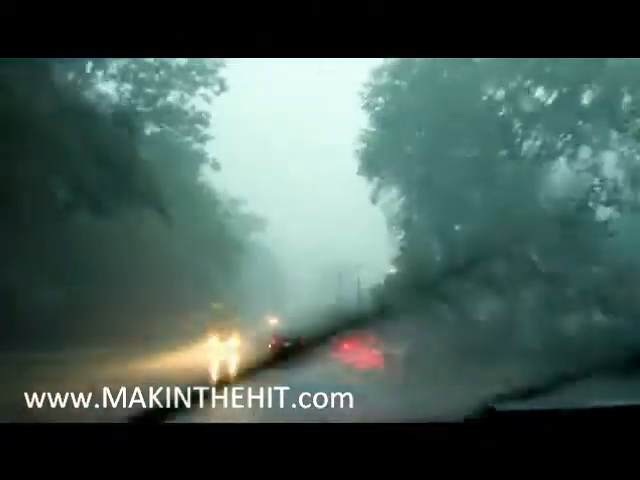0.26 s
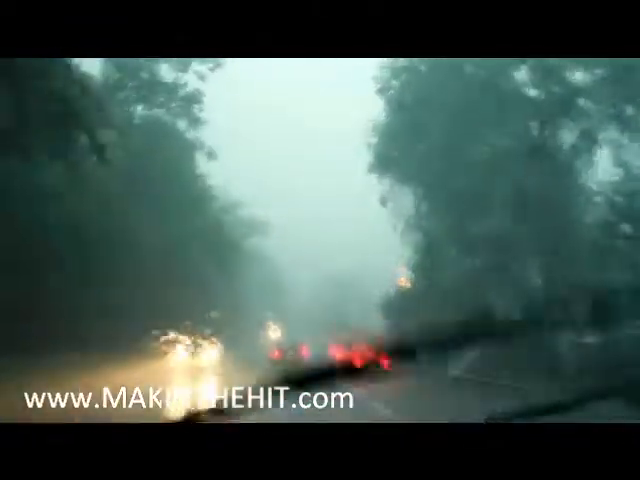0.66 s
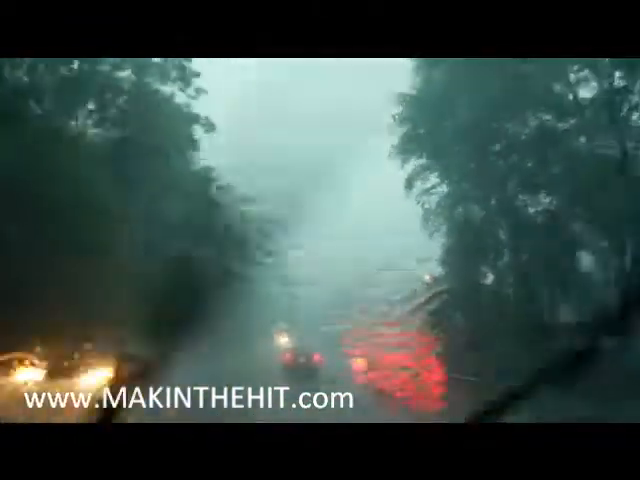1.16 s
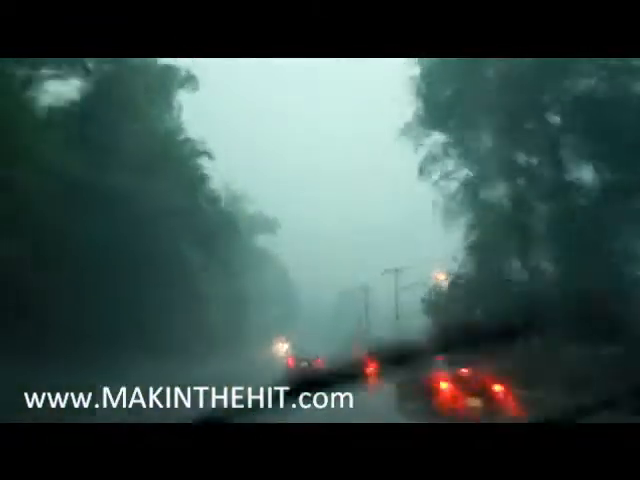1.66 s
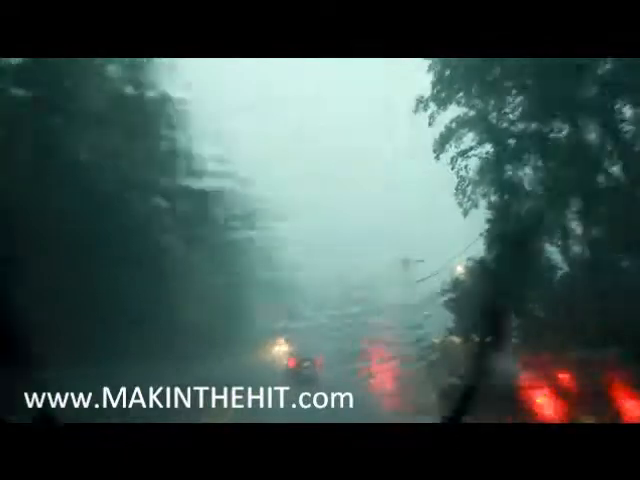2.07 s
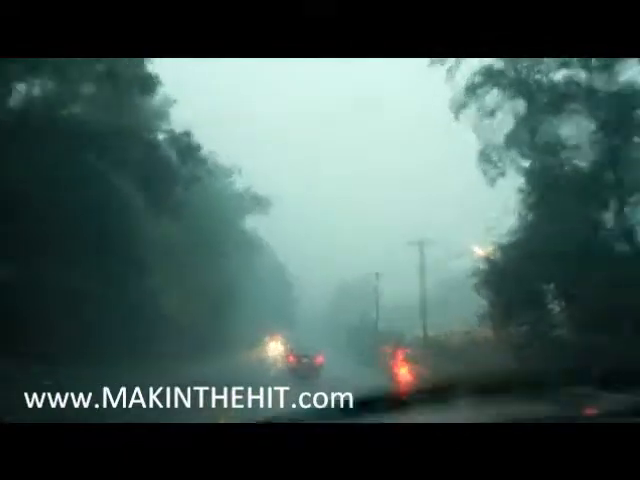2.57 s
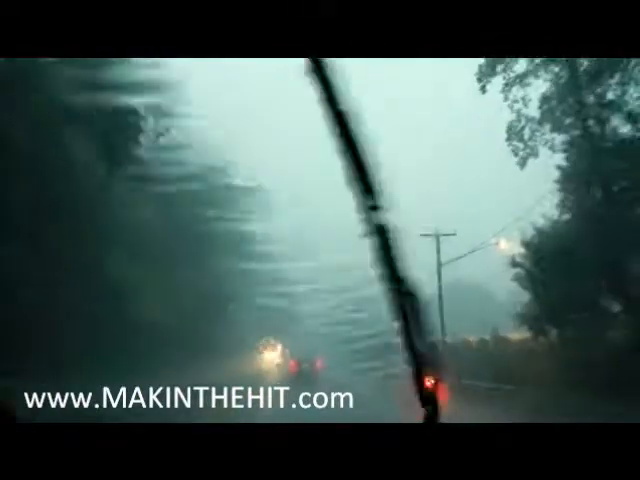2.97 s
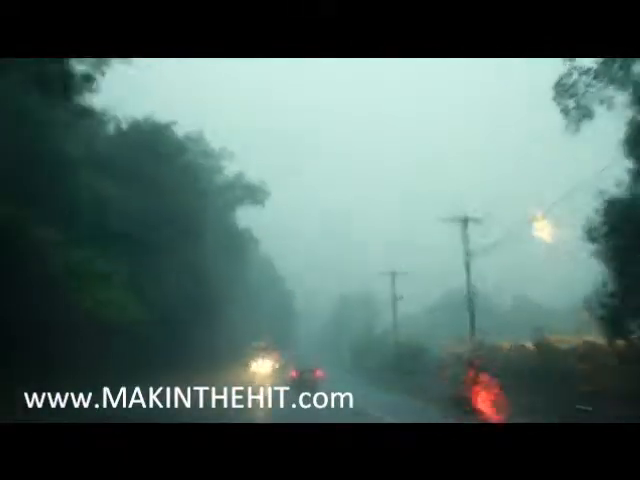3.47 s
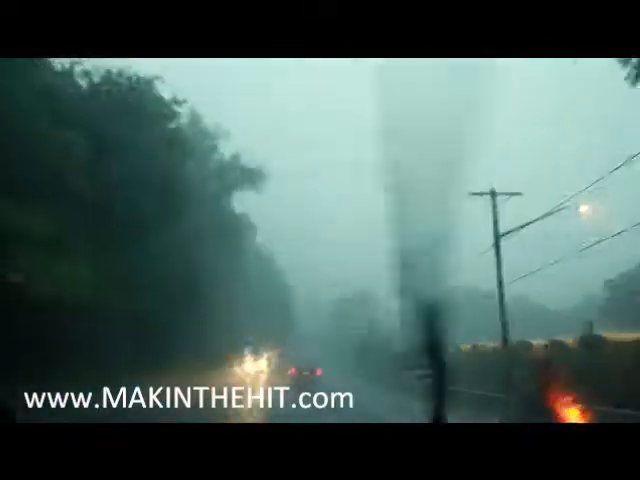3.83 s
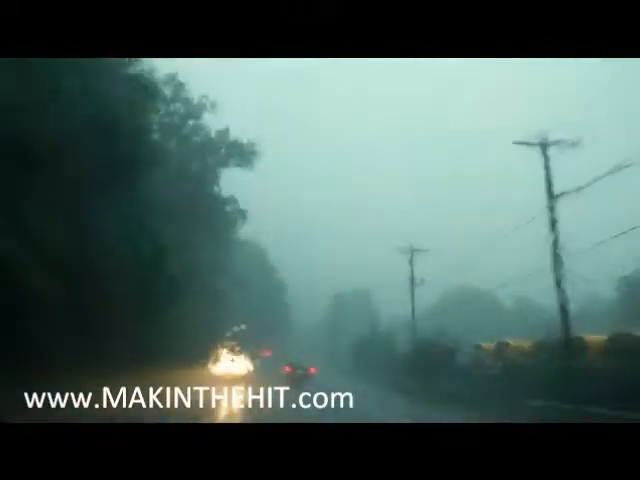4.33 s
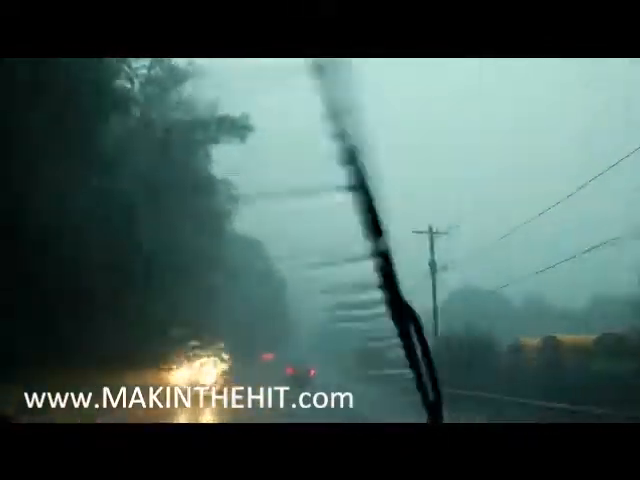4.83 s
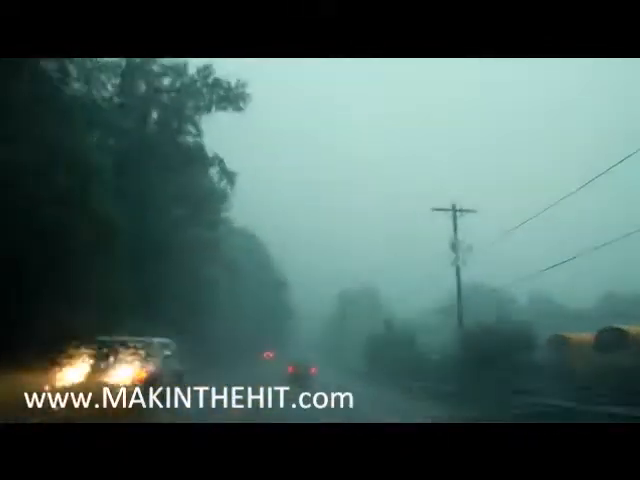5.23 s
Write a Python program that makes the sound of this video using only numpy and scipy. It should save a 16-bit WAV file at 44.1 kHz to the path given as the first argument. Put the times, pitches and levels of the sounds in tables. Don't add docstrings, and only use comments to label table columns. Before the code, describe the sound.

Hard hail snaps and splinters against a windshield over drumming rain, dull roof knocks and low car rumble, the loudest hits distorting.

```python
import sys
import numpy as np
from scipy import signal
from scipy.fft import rfft, irfft
from scipy.io import wavfile
from scipy.ndimage import uniform_filter1d

SR = 44100
rng = np.random.default_rng(int(sys.argv[2]) if len(sys.argv) > 2 else 0)


def rack_gain(trim_db):
    fader = np.asarray(trim_db, float)
    return 10 ** (fader / 20)


def int16_out(signal):
    q = np.round(np.clip(np.atleast_2d(signal).T, -1, 1) * 32767)
    wavfile.write(sys.argv[1], SR, q.astype(np.int16))


N = 242550
TIME = np.arange(N) / SR

# (time [s], level [dB])
DOWNPOUR = [(0.0, -29.5), (.25, -26), (.6, -27.5), (.75, -28), (.92, -26.5), (1.15, -21), (1.375, -31),
            (1.5, -27), (1.95, -28), (2.15, -25.5), (2.5, -26.5), (2.88, -21), (3.12, -26.5), (3.27, -24.5),
            (3.7, -27.5), (4.0, -28.5), (4.25, -30.5), (5.5, -24.5)]
# (frequency [Hz], density [dB per Hz])
GLASS_SPECTRUM = [(350, 2), (600, -7.5), (900, -4.5), (1300, -4.5), (1900, -4), (2600, -1.5), (3300, -1.5),
                  (5000, -8), (7300, -15.5), (9800, -19), (12400, -18), (13800, -22.5), (16000, -26)]
# (frequency [Hz], density [dB per Hz])
ROOF_SPECTRUM = [(130, -22), (220, -10.5), (350, 0), (390, -5), (461, -1.5), (513, -6.5), (758, -9.5),
                 (830, -16.5), (989, -12.5), (1600, -21), (2080, -45), (3520, -120)]
# (time [s], heard peak [dB], ring [Hz], body [dB])
LARGE_STONES = [(0.3252, -7, 4770, -21.5), (0.3418, -12, 2570, -20), (0.6518, -3, 3330, -21),
                (0.7699, -4.5, 3280, -21.5), (0.811, -11, 2750, -23.5), (1.002, -19, 3240, -10),
                (1.0155, -5, 3840, -14.5), (1.3115, -10.5, 1810, -9), (1.3165, -13, 5070, -27.5),
                (1.4471, -17.5, 2300, 9), (1.6313, -14, 3120, -13), (1.6655, -12, 1580, -23.5),
                (1.8982, -12, 3520, -4), (2.0986, -10.5, 3240, -10), (2.4176, -1.5, 3280, -18),
                (2.5301, -13.5, 3420, -8), (2.6287, -10.5, 2200, 1), (2.7404, -10, 3190, -24),
                (3.3805, -25, 2750, -9), (3.8664, -1.5, 3400, -15.5), (4.2331, -8.5, 2350, -1.5),
                (4.3104, -9.5, 3480, -25), (4.409, -14.5, 1480, -18.5), (4.410, -9, 4000, -24.5),
                (4.6372, -14, 2540, 6.5), (4.7982, -12, 2350, -5), (4.8303, -12, 2780, 3),
                (5.0915, -12, 3710, 2.5), (5.2478, -10.5, 3100, -18), (5.2876, -14, 3200, -20)]
# (time [s], heard peak [dB], ring [Hz], body [dB])
SECOND_BLOWS = [(0.7758, -10.5, 2870, -30.5), (1.0152, -8, 1990, -1), (1.3044, -13, 1560, -21),
                (1.3095, -13.5, 3150, 4), (2.6334, -13, 2640, 8), (3.0684, -15.5, 4430, -9),
                (3.0884, -10.5, 2590, 2), (3.1694, -10.5, 5370, -19.5), (1.453, -17.5, 2290, -2),
                (3.8584, -13.5, 3360, -17), (3.912, -26.5, 1740, 17), (4.2434, -13.5, 1850, 7),
                (4.8026, -15, 2680, 14), (5.3544, -11, 3100, -6)]
# (time [s], heard peak [dB])
SMALL_PELLETS = [(0.07, -17), (0.1072, -17), (0.3073, -16), (0.9837, -33), (2.1782, -14), (2.9026, -12),
                 (3.001, -16), (3.1432, -24), (3.1556, -12.5), (3.5427, -16), (3.773, -12.5), (3.821, -13),
                 (4.2973, -15), (4.4002, -17.5), (4.477, -17), (4.5105, -12), (4.858, -16), (4.8838, -16.5),
                 (4.9494, -12.5), (5.042, -13), (5.1843, -23), (5.191, -11), (5.3664, -16), (5.469, -18)]
# (time [s], level [dB], heard peak 10 dB lower)
SPLINTERS = [(0.1436, -8), (0.28, -10), (0.4905, -7), (0.6516, 5.5), (0.7395, -16), (0.776, -5),
             (0.81, -11), (1.0155, 4), (1.318, -3), (1.632, -4.5), (1.8751, -12), (1.941, -12),
             (2.0226, -5.5), (2.323, -4), (2.4034, -4), (2.4181, 8.5), (3.043, -3), (3.0742, 0.5),
             (3.171, -2.5), (3.3805, -3), (3.8681, 1.5), (4.1969, -14), (4.3089, 2.5), (4.4772, -9),
             (4.5607, -6.5), (4.797, -11.5), (4.8276, -8.5), (5.2879, -7), (5.3203, -7), (5.3519, 0)]
# (time [s], level [dB], heard peak 2.5 dB lower, ring [Hz])
ROOF_STONES = [(0.017, -18, 369), (0.259, -15, 338), (0.455, -22, 350), (0.507, -11, 473),
               (0.578, -13, 385), (0.769, -23.5, 349), (0.974, -21.5, 348), (1.307, -18, 440),
               (1.445, -20, 426), (1.663, -23, 345), (1.996, -14.5, 371), (2.258, -24, 436),
               (2.632, -13, 446), (2.745, -17, 327), (2.814, -24, 473), (3.084, -17, 340), (3.36, -29, 388),
               (3.438, -18, 332), (3.592, -8.5, 423), (3.625, -13.5, 446), (3.911, -22.5, 560),
               (4.204, -19, 472), (4.23, -12.5, 294), (4.799, -16, 357), (4.83, -13, 357),
               (4.885, -24, 260), (5.092, -18, 420), (5.246, -3.5, 521)]
# (time [s], heard peak [dB], frequency [Hz], t60 [s])
LONE_MODES = [
    (.770, -7.5, 2720, 0.0041),
    (.811, -30, 2400, 0.037),
    (1.0162, -19.5, 1890, 0.053),
    (1.0155, -20.5, 3880, 0.09),
    (2, -28, 3560, 0.0079),
    (2.645, -18.5, 210, 0.13),
    (4.235, -17, 2440, 0.026),
    (5.1, -17.5, 790, 0.032),
    (5.2572, -15, 480, 0.1),
]
# (time [s], level before the trim [dB], frequency [Hz])
PANEL_BOOMS = [
    (0.51, -19.5, 157),
    (0.573, -22, 146),
    (2.632, -20, 192),
    (3.579, -31, 157),
    (3.799, -20, 193),
    (4.232, -28, 184),
    (4.82, -20.5, 177),
    (5.095, -19, 104),
    (5.435, -16, 137),
    (5.459, -20, 135),
]
# (time [s], level [dB])
BODY_SHAKE = [(0, -31), (.2, -37), (.4, -35), (.53, -30), (.8, -33.5), (1.0, -28), (1.36, -38),
              (1.5, -29.5), (1.87, -34.5), (2.3, -34), (2.65, -27.5), (3.1, -31), (3.4, -30), (3.95, -31.5),
              (4.6, -31), (4.88, -27), (5.299, -31.5), (5.47, -24.5)]
# (frequency [Hz], density [dB per Hz])
BODY_SPECTRUM = [(38, -51), (65, -9), (124, 2), (146, 4.5), (215, -5.5), (280, -17), (360, -32),
                 (620, -120)]
# (time [s], heave [dB])
ROAD_BUMPS = [
    (1.125, 6),
    (1.75, 7),
    (2.1, 9),
    (2.869, 4),
    (3.22, 11),
    (3.5, 18),
    (4.52, 9),
    (4.82, 15),
    (5.05, 11),
    (5.25, 14),
]
# (frequency [Hz], density [dB per Hz])
ROAD_SPECTRUM = [(18, -30), (31, -11), (42, 2), (70, -7), (100, -26)]
# (time [s], depth [dB], recovery [s])
OVERLOADS = [(0.656, 13, 0.15), (0.772, 11, 0.18), (0.812, 13, .1), (1.018, 17, .16), (1.32, 8.5, 0.14),
             (1.450, 6.5, 0.22), (1.634, 4, 0.15), (2.417, 9.5, 0.12), (2.634, 7.5, 0.11), (2.742, 7, .14),
             (3.171, 3.5, 0.13), (3.865, 9.5, 0.061), (4.236, 0.5, .14), (4.311, 3.5, 0.18),
             (4.412, 4, 0.083), (4.828, 4.5, 0.097), (5.353, 3, 0.13)]

STONE_T60_S, BOUNCE_T60_S, PELLET_T60_S, TICK_T60_S = 0.014, 0.013, 0.009, 0.0092
STONE_TOP_DB, BOUNCE_TOP_DB, PELLET_TOP_DB = -13, -3, -17
HEAVY_T60_PER_DB = 0.15
HARD_STONE_T60_PER_DB = 0.14
SOFTNESS = 0.05
PELLET_HZ, PELLET_SCATTER, PELLET_BODY_DB = 2800, 0.07, -8
CAPSULE_HZ, CAPSULE_WIDTH_HZ = 11500, 1200
THUMP_T60_S, HARD_T60_PER_DB = 0.029, 0.52
BOOM_RISE_S, BOOM_T60_S, BOOM_TRIM_DB = 0.0061, 0.2, -4
ROOF_DB, ROOF_SHAKE_SHARE = -3, 0.11
BODY_DB, ROAD_DB, BUMP_S = -1.5, -53, 0.089
ATTACK_S, HOLD_SHARE = 0.0097, 0.65
CEILING = 0.66
EDGE_HZ, EDGE_HZ_PER_DB, EDGE_FLUTTER_HZ, EDGE_STEP_HZ = 13950, 60, 400, 475


def unit(x):
    return x / np.sqrt(np.mean(x ** 2))


def band(x, hz, width_hz):
    b, a = signal.iirpeak(min(hz, 0.45 * SR), hz / width_hz, fs=SR)
    return signal.lfilter(b, a, x)


def colour(x, points):
    hz, db = np.transpose(points)
    log_hz = np.log(np.arange(N // 2 + 1) * SR / N + 1)
    curve_db = np.interp(log_hz, np.log(hz), db, left=-90, right=-90)
    return unit(irfft(rfft(x) * rack_gain(curve_db), N))


def walk(rate):
    k = int(SR / rate)
    steps = np.repeat(rng.standard_normal(N // k + 1), k)
    slewed = uniform_filter1d(uniform_filter1d(steps, k), k)
    return unit(slewed[:N])


def fade(t60, rise_s):
    t = np.arange(SR // 10) / SR
    decay = np.exp(-np.log(1000) * t / max(t60, 0.003))
    return t, (1 - np.exp(-t / rise_s)) * decay


def add(track, s, sound, db):
    i = int(s * SR)
    piece = sound[:N - i] / np.abs(sound).max()
    track[i:i + len(piece)] += piece * rack_gain(db - GAIN_DB[i])


def patter(per_s, spread_db, splash_s):
    chance = rng.random((int(per_s * N / SR), 2))
    power = np.zeros(N)
    sizes_db = np.minimum(-spread_db * np.log(chance[:, 1] + 1e-9), 3.6 * spread_db)
    moments = (chance[:, 0] * N).astype(int)
    np.add.at(power, moments, rack_gain(sizes_db) ** 2)
    power = signal.lfilter([1], [1, -np.exp(-1 / (splash_s * SR))], power)
    return unit(np.sqrt(power) * rng.standard_normal(N))


def rain(glass_db, roof_db):
    spray = patter(3000, spread_db=1.5, splash_s=0.00098) * rack_gain(1.21 * walk(24.97))
    drops = patter(350, spread_db=5.0, splash_s=0.0012)
    bright = signal.lfilter([1, -0.8], [1], drops)
    glass = colour(spray + 0.95 * unit(bright), GLASS_SPECTRUM)
    drum = patter(500, spread_db=0.5, splash_s=0.0098) + 0.45 * drops
    return rack_gain(glass_db) * glass + rack_gain(roof_db) * colour(drum, ROOF_SPECTRUM)


def hail():
    out = np.zeros(N)
    for s, db, hz, top_db, body_db, t60 in stones():
        grit = shatter(t60, SOFTNESS * t60, tail=0.61)
        crack = unit(band(grit, hz, 0.48 * hz)) + 0.68 * unit(band(grit, 3140, 3000))
        top = rack_gain(top_db) * unit(band(grit, 12100, 5500))
        body = rack_gain(body_db) * unit(band(grit, 850, 1000))
        add(out, s, unit(crack) + top + body, db - 0.1)
    for s, db in SPLINTERS:
        grit = shatter(TICK_T60_S, 0.00021, tail=0.11)
        tick = band(grit, CAPSULE_HZ, CAPSULE_WIDTH_HZ) + band(grit, 6600, 6200)
        add(out, s, tick, db - 10.0)
    return out


def stones():
    rows = []
    for table, top_db, t60 in ((LARGE_STONES, STONE_TOP_DB, STONE_T60_S),
                               (SECOND_BLOWS, BOUNCE_TOP_DB, BOUNCE_T60_S)):
        for s, db, hz, body_db in table:
            longer_db = HEAVY_T60_PER_DB * body_db - HARD_STONE_T60_PER_DB * (db + 10)
            rows.append((s, db, hz, top_db, body_db, t60 * rack_gain(longer_db)))
    rings = PELLET_HZ * np.exp(PELLET_SCATTER * rng.standard_normal(len(SMALL_PELLETS)))
    for (s, db), hz in zip(SMALL_PELLETS, rings):
        rows.append((s, db, hz, PELLET_TOP_DB, PELLET_BODY_DB, PELLET_T60_S))
    return rows


def shatter(t60, rise_s, tail):
    t, shape = fade(t60, rise_s)
    splinters = np.sign(rng.standard_normal(len(t)))
    cabin = fade(4.67 * t60, 0.0055)[1]
    contact = np.arange(len(t)) == int(2 * rise_s * SR)
    return splinters * (shape + tail * cabin) + 1.46 * contact


def thumps():
    out = np.zeros(N)
    for s, db, hz in ROOF_STONES:
        t, shape = fade(THUMP_T60_S * rack_gain(-HARD_T60_PER_DB * db), 0.0006)
        low = np.sin(2 * np.pi * hz * t)
        middle = 0.52 * np.sin(2 * np.pi * 1.23 * hz * t)
        high = 0.5 * shape * np.sin(2 * np.pi * 1.447 * hz * t)
        add(out, s + 0.002, shape * (low + middle + high), db - 2.5)
    for s, db, hz, t60 in LONE_MODES:
        t, shape = fade(t60, 0.00056)
        add(out, s, shape * np.sin(2 * np.pi * hz * t), db)
    return out


def booms():
    out = np.zeros(N)
    for s, db, hz in PANEL_BOOMS:
        t, shape = fade(BOOM_T60_S, BOOM_RISE_S)
        closing = np.cos(np.pi * t / (2 * t[-1]))
        add(out, s, shape * np.sin(2 * np.pi * hz * t) * closing, db + BOOM_TRIM_DB)
    return out


def sleet(glass_db):
    grains = patter(90, spread_db=3.0, splash_s=0.0003)
    return rack_gain(glass_db - 17) * unit(band(grains, 8000, 9000))


def rumble(body_db, road_db):
    body = rack_gain(body_db + 0.79 * walk(12)) * colour(rng.standard_normal(N), BODY_SPECTRUM)
    return body + rack_gain(road_db) * colour(rng.standard_normal(N), ROAD_SPECTRUM)


def gain_db():
    pulls = [np.zeros(N)]
    for s, depth_db, recovery_s in OVERLOADS:
        t = np.maximum(TIME - s, 0)
        recovery = np.exp(-np.maximum(t / recovery_s - HOLD_SHARE, 0))
        pulls.append(-depth_db * (1 - np.exp(-t / ATTACK_S)) * recovery)
    return np.min(pulls, axis=0)


GAIN_DB = gain_db()


def top_cut(x):
    hz, s, blocks = signal.stft(x, SR, nperseg=1024)
    treble = blocks[(hz > 11500) & (hz < 13000)]
    power = uniform_filter1d(np.mean(np.abs(treble) ** 2, axis=0), size=4)
    treble_db = 10 * np.log10(power / np.median(power))
    flutter = np.repeat(rng.standard_normal(len(s)), repeats=3)[:len(s)]
    edge = EDGE_HZ + EDGE_HZ_PER_DB * treble_db + EDGE_FLUTTER_HZ * flutter
    edge = EDGE_STEP_HZ * np.round(np.clip(edge, 13300, 15700) / EDGE_STEP_HZ)
    return signal.istft(blocks * (hz[:, None] < edge - 150), SR, nperseg=1024)[1][:N]


def scene():
    pour_db = np.interp(TIME, *np.transpose(DOWNPOUR))
    shake_db = np.interp(TIME, *np.transpose(BODY_SHAKE))
    heaves = [db * np.exp(-((TIME - s) / BUMP_S) ** 2 / 2) for s, db in ROAD_BUMPS]
    road_db = ROAD_DB + np.max(heaves, axis=0)
    excess_db = shake_db - pour_db
    roof_db = pour_db + ROOF_DB + ROOF_SHAKE_SHARE * (excess_db - np.mean(excess_db))
    wet = rain(pour_db, roof_db) + rumble(shake_db + BODY_DB, road_db)
    return (wet + hail() + thumps() + booms() + sleet(pour_db))[None]


def band_limit(x):
    return signal.sosfilt(signal.butter(12, 15980, fs=SR, output="sos"), x)


def record(dry):
    ridden = dry * rack_gain(GAIN_DB)
    clipped = ridden / (1 + (ridden / CEILING) ** 8) ** (1 / 8)
    mix = top_cut(clipped[0])[None]
    return band_limit(mix)


dry = scene()
out = record(dry)
int16_out(out)
```